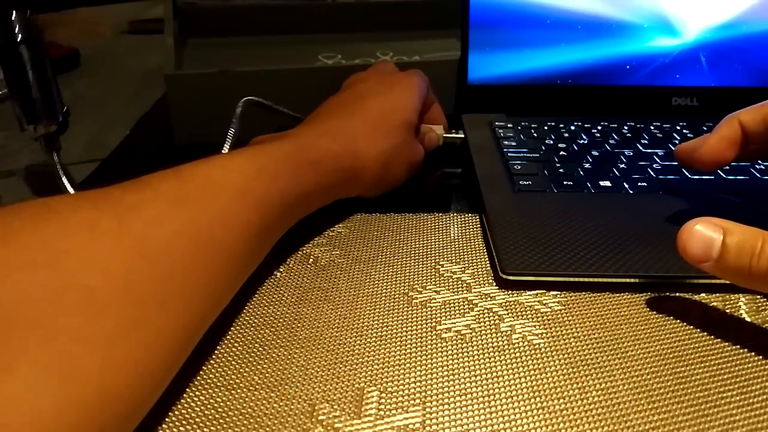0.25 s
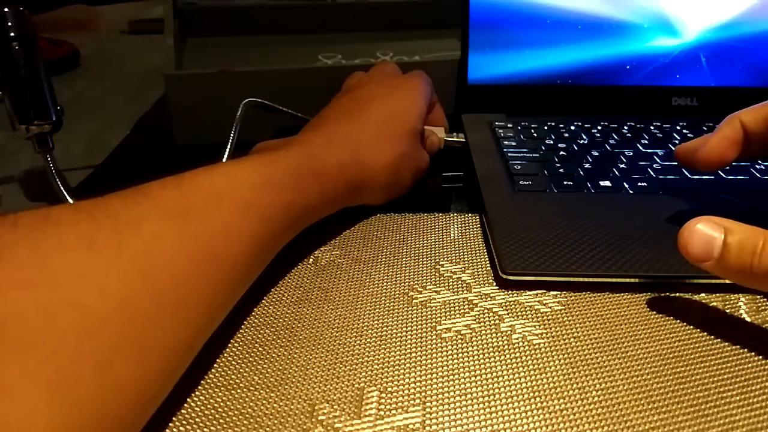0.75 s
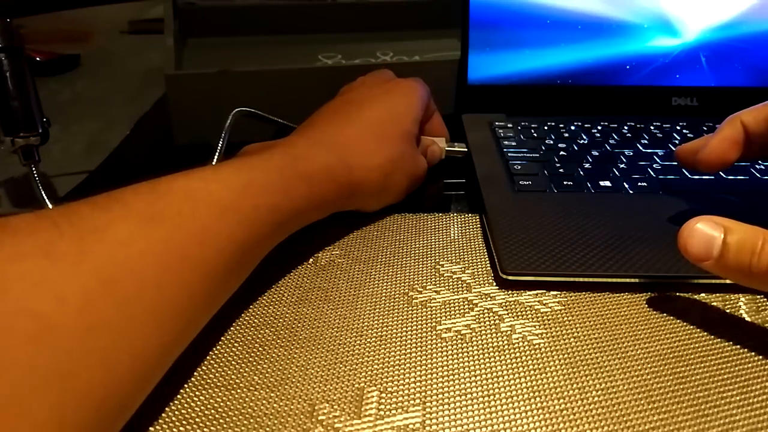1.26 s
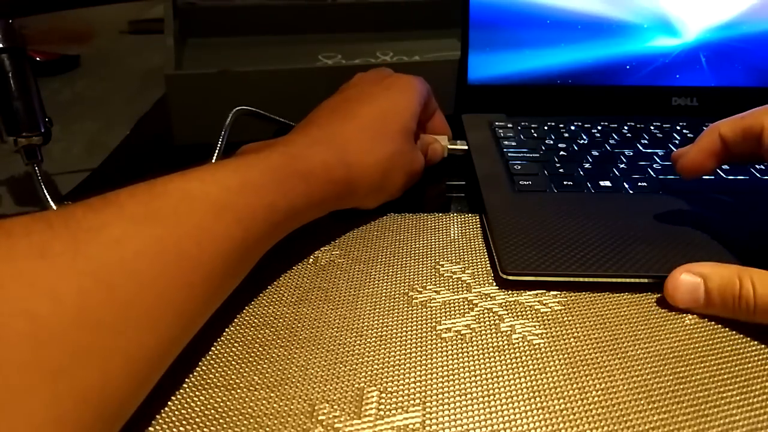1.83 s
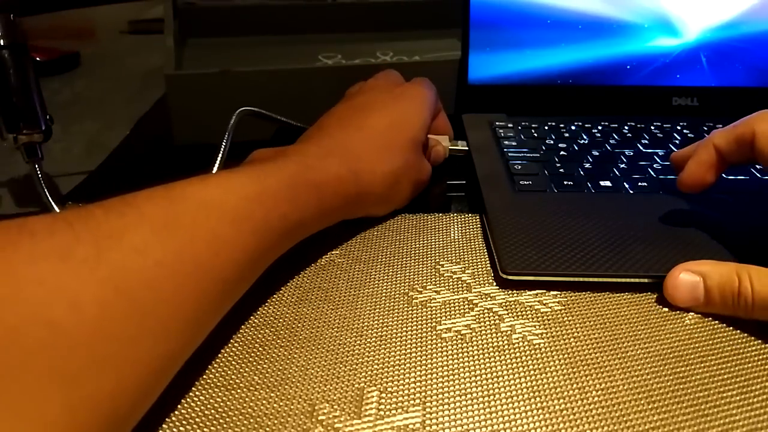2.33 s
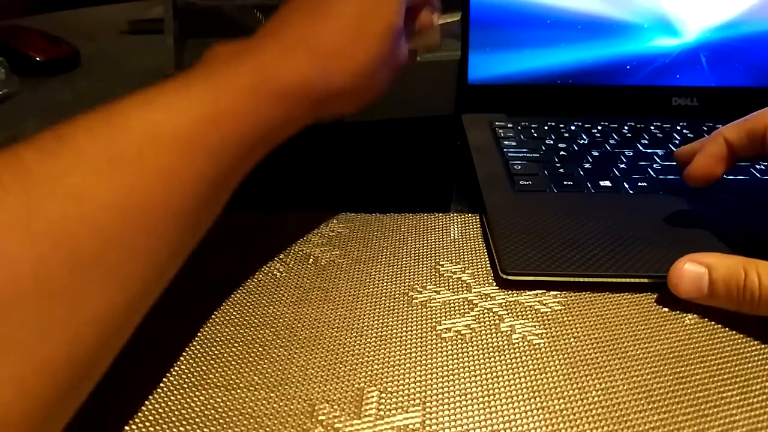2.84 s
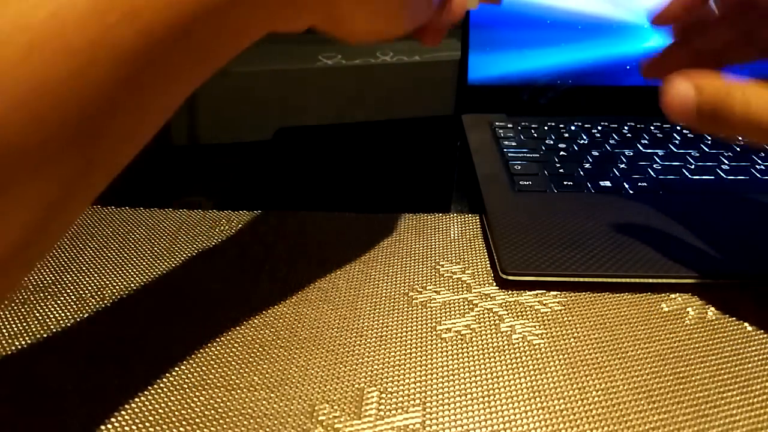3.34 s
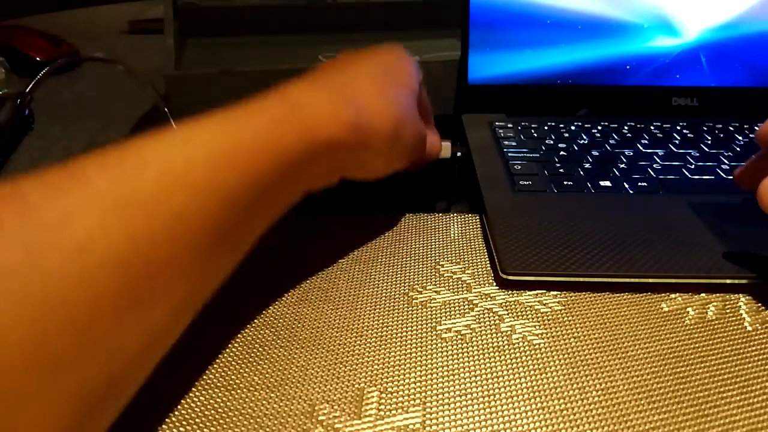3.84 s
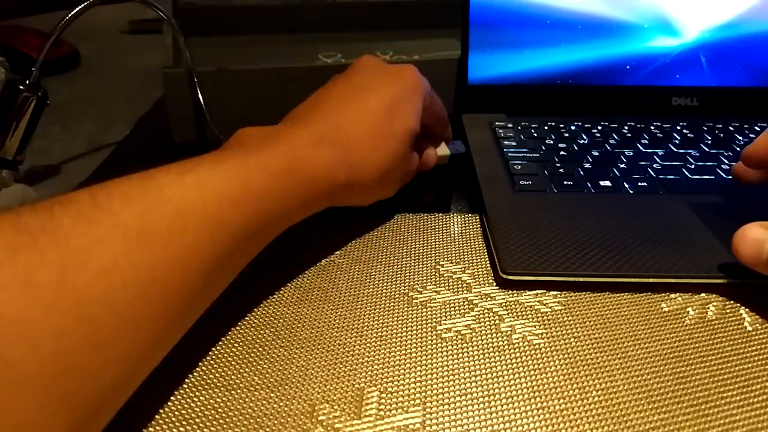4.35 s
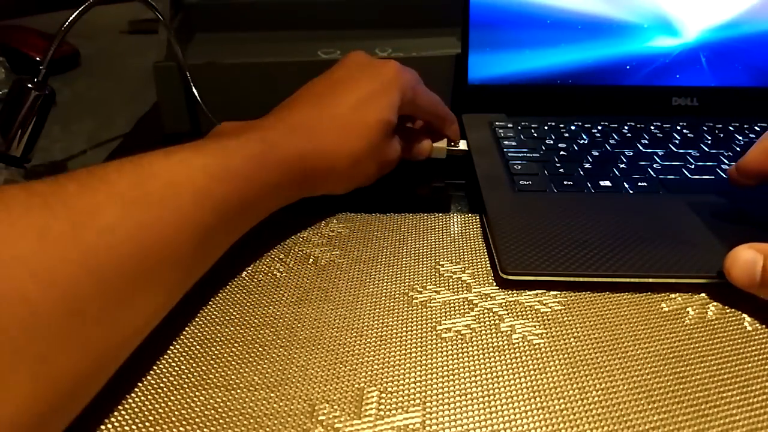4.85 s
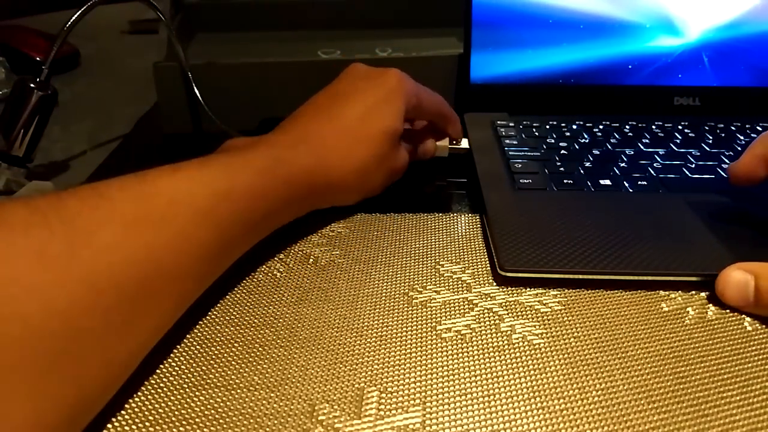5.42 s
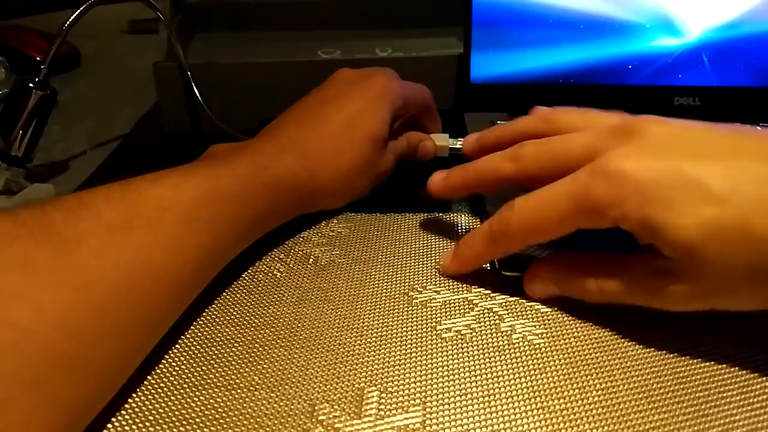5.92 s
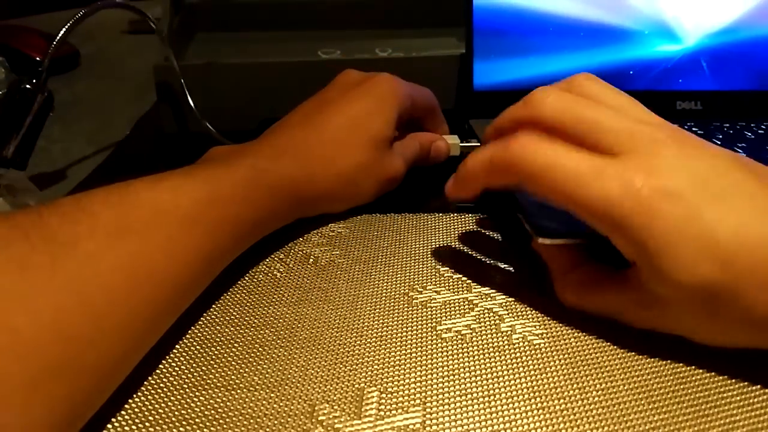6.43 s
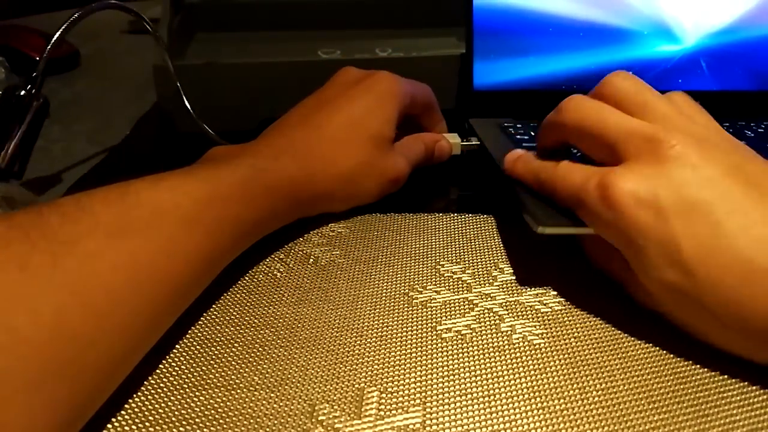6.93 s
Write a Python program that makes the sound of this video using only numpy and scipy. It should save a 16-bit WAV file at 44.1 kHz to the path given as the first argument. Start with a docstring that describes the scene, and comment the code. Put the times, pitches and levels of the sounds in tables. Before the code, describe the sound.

Over a steady quiet fan, a small metal connector snaps in a socket, clatters sharply mid-way, and hands slide, tap and bump.

```python
"""A metal USB plug is worked in a laptop port, pulled out and offered up again, in a quiet room.
Throughout, a fan hums: coloured noise and wavering tones. First the shell grazes the rim in light ticks,
then the plug clicks in its socket: short noise cracks through case resonances, with a hollow knock.
Next come slides (swelling noise), soft bumps (narrow-band noise) and taps of the fingers (noise cracks).
Last to join are hard knocks, the desk top ringing on after them, then scrapes: both runs of tiny notes."""
import sys
import numpy as np
from scipy import signal
from scipy.fft import rfft, irfft
from scipy.io import wavfile
from scipy.ndimage import uniform_filter1d

SR = 44100
rng = np.random.default_rng(int(sys.argv[2]) if len(sys.argv) > 2 else 0)


def materialize(psi):
    """Save the field psi as 16-bit PCM at rate SR to the path in sys.argv[1].

    A 1-D psi becomes a single channel; in a 2-D psi each row is a channel.
    """
    bounded = np.clip(np.atleast_2d(psi).T, -1, 1)
    quanta = np.round(bounded * 32767).astype(np.int16)
    wavfile.write(sys.argv[1], SR, quanta)


N = 316638


def amp(db):
    """Level law: a gain is ten to the power of its decibels over twenty."""
    return 10 ** (np.asarray(db) / 20)


def evened(x):
    """Normalization: scales a signal to an rms of one."""
    return x / np.sqrt(np.mean(abs(x) ** 2) + 1e-20)


def read(points, hz):
    """Interpolation along a logarithmic frequency axis."""
    f, value = np.transpose(points)
    return np.interp(np.log(hz + 1), np.log(f + 1), value)


def bins(x):
    """Fourier analysis: the frequencies [Hz] in the spectrum of x."""
    return np.fft.rfftfreq(x.shape[-1], 1 / SR)


def add(mix, s, sound):
    """Superposition: a stereo sound joins the mix at time s [s]."""
    part = mix[:, round(s * SR):][:, :sound.shape[1]]
    part += sound[:, :part.shape[1]]


def sides(left_db):
    """Interchannel level difference, shared equally between the two gains."""
    return amp(np.array([left_db, -left_db]) / 2)


# likeness of the two microphone signals: (frequency [Hz], correlation [-1 to 1])
LIKENESS = [(130, 0.99), (290, 0.91), (450, 0.46), (680, -0.26), (1400, -0.28), (3000, 0.062)]


def paired(x, reach=1):
    """Spatial coherence: close microphones share long waves; direct sound does so up to reach times higher."""
    left, other = rfft(x)
    same = np.clip(read(LIKENESS, bins(x) / reach), -1, 1)
    right = same * left + np.sqrt(1 - same ** 2) * other
    return irfft(np.array([left, right]), x.shape[1])


def noise(spectrum):
    """Spectral shaping: stereo noise of a given colour and unit rms."""
    x = paired(rng.standard_normal((2, N)))
    return evened(irfft(rfft(x) * amp(read(spectrum, bins(x))), N))


def drift(rate):
    """Low-pass random process: slow chance of unit rms, limited to about rate [Hz]."""
    x = rng.standard_normal(N)
    return evened(irfft(rfft(x) * np.exp(-(bins(x) / rate) ** 2), N))


def coloured(x, gain_db, size=4096):
    """Minimum-phase filtering: it is causal, so every peak of the gain rings after the blow."""
    log_gain = np.log(amp(gain_db(np.abs(np.fft.fftfreq(size, 1 / SR)))))
    minimum_phase = np.exp(np.conj(signal.hilbert(log_gain)))
    taps = np.fft.ifft(minimum_phase).real
    return signal.fftconvolve(x, taps[None], axes=1)


LEAD = .004  # margin before a contact [s]


def contact(rise, scatter, scatter_db, reach, size=2048):
    """Impact: many tiny contacts swell and die in milliseconds, then scatter off desk and screen."""
    t = np.arange(size) / SR - LEAD
    u = np.maximum(t / rise + .5, 0)
    crack = u * np.exp(-u)
    echoes = (t > 0) * np.exp(-abs(t) / scatter)
    envelope = evened(crack) + amp(scatter_db) * evened(echoes)
    z = rfft(paired(envelope * rng.standard_normal((2, size)), reach))
    smooth_power = uniform_filter1d(abs(z) ** 2, size=17, axis=1)
    white = irfft(z / np.sqrt(smooth_power))
    return white * signal.windows.tukey(size, .1)


# reverberation of the room: (frequency [Hz], time to fall by 60 dB [s])
REVERBERATION = [(250, 0.49), (660, 0.71), (1740, 0.84), (4600, 0.73), (9000, 0.56), (14000, 0.34)]
CLUMP_DB = 1.5  # reflections arrive in uneven clumps: rms of their level [dB]


def room_tail():
    """Reverberation: diffuse reflections of unit energy (left), each band dying at its own speed."""
    hz, t, z = signal.stft(paired(rng.standard_normal((2, SR * 3 // 4))), SR, nperseg=256)
    t60 = read(REVERBERATION, hz)[:, None]
    clumps = CLUMP_DB * evened(uniform_filter1d(rng.standard_normal(len(t)), size=2))
    onset = 1 - np.exp(-t / 0.00058)
    tail = signal.istft(z * amp(clumps - 60 * t / t60) * onset, SR, nperseg=256)[1]
    return tail / np.linalg.norm(tail[0])


def in_room(x, room_db):
    """Convolution with the room response, added to the dry sound."""
    return x + amp(room_db) * signal.fftconvolve(x, room_tail(), axes=1)[:, :N]


def body_db(resonances, hz, between_db):
    """Modal response: the powers of a struck body's resonances add to a plain background."""
    peaks = sum(amp(db) ** 2 / (1 + (2 * (hz - f) / width) ** 2) for f, width, db in resonances)
    return 10 * np.log10(amp(between_db) ** 2 + peaks)


# single reflections from wall and ceiling: (delay [s], level [dB])
REFLECTIONS = [(.0108, -19), (.0182, -16)]


def heard(crack, resonances, wet_db, between_db, focus_db, ragged_db):
    """Direct, early and late sound: the ring mostly fills the room; each spot favours its own partials."""
    room = amp(wet_db) * np.pad(room_tail(), ((0, 0), (round(LEAD * SR), 0)))
    near = np.zeros_like(room)
    add(near, 0, crack)
    for delay, db in REFLECTIONS:
        add(near, delay, amp(db) * crack[::-1])  # arrives from the other side
    near = coloured(near, lambda hz: body_db(resonances, hz, between_db), size=16384)
    room = coloured(room, lambda hz: body_db(resonances, hz, between_db + focus_db), size=16384)
    spots_hz = np.arange(0, SR / 2, 130)
    chance = np.clip(rng.standard_normal(len(spots_hz)), -2, 1)
    ripple = chance * np.interp(spots_hz, [800, 3000], [0, 1])  # the lowest partials stay even
    return coloured(near + room, lambda hz: ragged_db * np.interp(hz, spots_hz, ripple))


# bands of a blow, namely thud, case ring, edge and top: (frequency [Hz])
BLOW_BANDS = [400, 1150, 2900, 9500]
# effect of hardness in each band of a blow: (gain per step of hardness [dB])
HARDNESS_GAIN = [0.8, -0.22, 0.5, 3]
# level difference of a blow between the channels: (frequency [Hz], left minus right [dB])
BLOW_SIDE = [(400, 0), (1200, 0), (2400, 2.5), (4400, 0.5), (8100, 7.5), (13500, 9)]


def blow(sound, tone, strength_db, hardness=0, weight_db=0, bass_db=-14):
    """Radiation of a blow: hardness tilts its spectrum, weight lifts its lows, small things give little bass."""
    levels = np.add(tone, strength_db) + np.multiply(hardness, HARDNESS_GAIN)
    points = list(zip(BLOW_BANDS, levels))
    low = [(130, bass_db + weight_db), (240, weight_db), (480, weight_db), (1000, 0)]
    sound = coloured(sound, lambda hz: read(points, hz) + read(low, hz))
    return irfft(rfft(sound) * sides(read(BLOW_SIDE, bins(sound))), sound.shape[1])


# resonances of the laptop case around the socket: (frequency [Hz], width [Hz], level [dB])
CASE_MODES = [(280, 80, 2), (590, 90, 0), (1010, 50, 5), (1270, 130, 3), (1490, 110, 8.5), (2280, 170, 6),
              (2980, 260, 0), (4900, 900, 3), (5800, 900, 5), (10100, 2500, 3)]


def click(s, strength_db, hardness=0, weight_db=0, pitch=1, *, tone, room_db, between_db):
    """Modal excitation: plug or finger meets the case, whose pitch depends on how it is pressed."""
    crack = contact(rise=.001, scatter=.008, scatter_db=-14, reach=3)
    case = [(hz * pitch, width, db) for hz, width, db in CASE_MODES]
    sound = heard(crack, case, room_db, between_db, focus_db=-6.5, ragged_db=1.5)
    return s - LEAD, blow(sound, tone, strength_db, hardness, weight_db)


def clicks(rows, tone, room_db, between_db):
    """Superposition of all the clicks of one kind."""
    out = np.zeros((2, N))
    for row in rows:
        add(out, *click(*row, tone=tone, room_db=room_db, between_db=between_db))
    return out


def ring(hz, db, swell, lag):
    """Flexural vibration: a panel note peaks after swell [s], then dies; it is lag [s] later at the right."""
    t = np.maximum(np.arange(SR // 6) / SR - np.array([[0], [lag]]), 0)
    envelope = t / swell * np.exp(1 - t / swell)
    return amp(db) * envelope * np.sin(2 * np.pi * hz * t)


# colour of fan and room air: (frequency [Hz], relative level [dB])
AIR_COLOUR = [(25, -11.5), (65, -20.5), (105, -6.5), (140, -19), (175, -3), (240, -0.5), (350, -5),
              (520, -8), (900, -12.5), (1250, -13.5), (2800, -25.5), (6500, -30), (10500, -28),
              (14000, -31)]
AIR_DB = -52.5  # level of the air before its rush swells
# tones of the fan: (frequency [Hz], rms level [dB])
FAN_TONES = [(177.6, -68), (241, -61), (281, -80), (479, -72.5), (527.6, -67)]


def fan(waver=0.5, wander=0.3, swell_db=1.57, swell_below_hz=1500):
    """Flow noise and tones: a low rush swells a little under an even hiss; tones waver in level and phase."""
    t = np.arange(N) / SR
    tones = np.zeros(N)
    for hz, db in FAN_TONES:
        phase = 2 * np.pi * hz * t + wander * drift(1.7)
        tones += amp(db) * evened((1 + waver * drift(1.8)) * np.sin(phase))
    air = amp(AIR_DB) * noise(AIR_COLOUR)
    rush = irfft(rfft(air) * np.exp(-(bins(air) / swell_below_hz) ** 2), N)
    return air + (amp(swell_db * drift(9.3)) - 1) * rush + tones


# the plug's shell grazes the rim of the port or the case:
# (time [s], strength [dB], hardness [steps], weight [dB], pitch of the case ring [ratio])
GRAZES = [(.1245, -23, -1.5, -6, 0.98), (.5721, -19, 4, 5, 0.86), (.775, -19, 0.5, -2, 0.85),
          (2.125, -40, 10, 15, 1.5), (2.6047, -26.5, 5.5, -14, 0.95), (2.866, -26.5, -1, 2, 0.4),
          (3.1442, -30.5, 6.5, -5, 1.4), (3.5418, -27, 9.5, 0, 0.88), (3.5526, -12.5, 7.5, -2, 1),
          (3.5582, -19.5, 12, 8.5, 0.54), (3.616, -9, 0, -7, 1.4), (4.031, -28.5, 10.5, 0, 0.78),
          (4.0965, -26.5, 9.5, -5, 1.3), (5.021, -20, 2.5, 6, 0.83), (5.9964, -16.5, 4.5, 3, 0.96),
          (6.1895, -20, 4, 4, 1), (7.041, -26, 6, 10, 0.87)]
# tone shared by all grazes, in each band of a blow: (level [dB])
GRAZE_TONE = [2.5, 0, -1.5, -28.5]


def grazes():
    """Light impact: the shell touches the rim and the case answers over a strong plain background."""
    return clicks(GRAZES, GRAZE_TONE, room_db=-5, between_db=4.0)


# the plug meets the socket or catches on its springs:
# (time [s], strength [dB], hardness [steps], weight [dB], pitch of the case ring [ratio],
#  room [dB], hollow knock [dB], note of the hollow knock [Hz])
SOCKET_CLICKS = [(1.6011, -2.5, -2, -2.5, 0.93, -8, -25.5, 1230),
                 (1.7118, -14, 1, -14, 0.886, -19, -32.5, 1115),
                 (1.9672, -0.5, 1, -2.5, 1.08, -8, -25.5, 1330),
                 (4.2714, 3, -3.5, -8, 0.79, 0.5, -21.5, 1250),
                 (4.8105, -13.5, 0.5, -5.5, 1, -2.5, -29, 1200), (5.2145, -23, -14, 18, 0.74, 5, -43, 950),
                 (5.368, -14.5, -3, 8, 1.05, -3.5, -41, 1270)]
# tone shared by all socket clicks, in each band of a blow: (level [dB])
SOCKET_TONE = [0.5, 0.5, -4, -16]
# lower notes of the case under a hollow knock: (frequency [Hz], level [dB], swell [s])
PANEL_NOTES = [(298, -22, 0.0064), (628, -18, 0.0054), (1010, -19.5, 0.0082)]
SWELL_S = 0.0012  # rise of the hollow knock
FLEX_DELAY_S = 0.00068  # from the snap to the answer of the case


def socket(between_db=-1.5, lag=0.00021):
    """Snap and panel flexure: the plug meets its springs, then a hollow knock, deeper under a heavy push."""
    out = np.zeros((2, N))
    for s, strength_db, hardness, weight_db, pitch, room_db, ring_db, ring_hz in SOCKET_CLICKS:
        add(out, *click(s, strength_db, hardness, weight_db, pitch,
                        tone=SOCKET_TONE, room_db=room_db, between_db=between_db))
        panel = sum(ring(hz, ring_db + db + weight_db / 2, swell, lag) for hz, db, swell in PANEL_NOTES)
        hollow = ring(ring_hz, ring_db, SWELL_S, lag)
        add(out, s + FLEX_DELAY_S, hollow + panel)
    return out


# skin and cable slide over case and cloth:
# (time of the strongest point [s], length [s], hiss [dB], extra treble at the left at BEAM_HZ [dB])
STROKES = [(2.791, 0.044, -55, 1), (2.842, 0.04, -52, -1), (3.104, 0.056, -61, 5), (3.215, 0.03, -68, 19.5),
           (4.019, 0.15, -50, 0), (4.262, 0.13, -42.5, 1), (5.773, 0.056, -62, 14),
           (6.37, 0.17, -56.5, 1.5), (6.649, 0.036, -64.5, 15), (6.741, 0.18, -65, 6), (7.098, 0.5, -61, 2)]
# colour of the hiss: (frequency [Hz], relative level [dB])
HISS_COLOUR = [(1000, -22), (2200, 6), (4000, 5), (6000, 4), (9200, 7), (11500, 3.5), (14500, -1.5)]
# colour of the dull scuff under every slide: (frequency [Hz], relative level [dB])
SCUFF_COLOUR = [(120, -35), (280, 2.5), (500, 1), (720, 0.5), (950, -3), (1300, -6.5), (2500, -14),
                (6000, -47), (14000, -31)]
SCUFF_DB = -53.5  # rms of the scuff before the stroke shapes it
RISE_SHARE = 0.4  # part of a slide spent gathering speed
CATCH_DB = 2.2  # rms unevenness of a slide as the surfaces catch
BEAM_HZ = 9700  # the extra treble grows in proportion to frequency


def slides(grit_db=2.0, room_db=-8):
    """Dry friction: noise swells and fades with each stroke, uneven as the surfaces catch."""
    t, out = np.arange(N) / SR, np.zeros((2, N))
    unevenness = amp(CATCH_DB * drift(200) + grit_db * drift(3000))
    hiss = noise(HISS_COLOUR) * unevenness
    scuff = amp(SCUFF_DB) * noise(SCUFF_COLOUR)
    for s, length, hiss_db, left_db in STROKES:
        near = abs(t - s) < 2 * length
        u = (t[near] - s) / length
        speed = np.exp(-(u / np.where(u < 0, RISE_SHARE, 1 - RISE_SHARE)) ** 2)
        left, right = amp(hiss_db) * hiss[:, near]
        left = irfft(rfft(left) * amp(left_db * bins(left) / BEAM_HZ), len(u))
        out[:, near] += speed * (np.array([left, right]) + scuff[:, near])
    return in_room(out, room_db)


# soft bumps of hand, cable and laptop on the desk:
# (time [s], length [s], frequency [Hz], rms level before the fade [dB])
SOFT_BUMPS = [(2.853, .07, 690, -50), (6.673, 0.05, 252, -46), (6.784, 0.049, 275, -41.5)]


def bumps(order=2):
    """Resonance under a random force: a soft, uneven push stirs one broad mode of desk top or case."""
    out = np.zeros((2, N))
    for s, length, hz, db in SOFT_BUMPS:
        push = paired(rng.standard_normal((2, SR // 2)), reach=2.1)
        band = signal.butter(order, [hz * .9, hz * 1.1], "band", fs=SR, output="sos")
        sway = signal.sosfilt(band, push)[:, -round(length * SR):]
        add(out, s, amp(db) * evened(sway) * signal.windows.hann(sway.shape[1]))
    return out


# fingertips and nails touch down: (time [s], strength [dB])
FINGER_TAPS = [(3.316, -30.5), (5.6843, -25.5), (5.7306, -19.5), (6.307, -31), (6.328, -23),
               (6.5073, -21.5), (6.8, -25.5), (7.1543, -20.5)]
# tone shared by all finger taps, in each band of a blow: (level [dB])
FINGER_TONE = [1.5, -8.5, -15.5, -9.5]


def fingers():
    """Light impact: a fingertip or nail meets the case, its resonances over a strong plain background."""
    return clicks(FINGER_TAPS, FINGER_TONE, room_db=2.0, between_db=10.0)


# harder knocks and their rebounds:
# (time [s], strength [dB], hardness [steps], weight [dB], direct sound to the left [dB],
#  share of metal ring [0-1], room [dB], leading note [dB], its pitch [Hz], its swell [s])
HARD_KNOCKS = [(3.5595, 0, -19.5, 21, -10, 0, 5, -30, 900, 0.0026),
               (3.5692, 8.5, 2.5, 3, -7, 0.9, 0, -36.5, 286, 0.0078),
               (3.7041, 3.5, 0, -7, -2, 0.7, -1, -28, 1980, 0.0014),
               (3.7072, -3, -11, 1, -7, 0, 2, -30, 944, 0.0025),
               (3.7200, 0.5, 2.5, 4, 4, 0.25, -1, -36, 470, .0035),
               (3.7238, -8.5, -2.5, 8.5, 5, 0.1, 3.5, -33.5, 974, 0.0037),
               (4.2728, 8.5, -1.5, -3.5, 0, 0.3, -4, -34, 720, 0.0095),
               (4.2802, 11.5, -10, 7, -1, 0, -8, -33.5, 450, 0.0022),
               (4.291, -1, -4, 8, 13, 0.2, 0, -35, 1170, 0.0021),
               (4.518, -15, -9.5, 12, 1, 0.2, 6, -49, 1320, .003),
               (6.2177, -5, -4, 9, -1, 0.24, 5, -34.5, 1194, 0.0014),
               (6.239, -6.5, -8, 12.5, 7, 0.3, -5, -37, 978, 0.0034),
               (6.25, -21, -18, 0, 0, 0, 0, -44, 697, 0.013)]
# tone shared by all knocks, in each band of a blow: (level [dB])
HARD_TONE = [-9, -8, -8.5, -14]
# resonances of the desk top: (frequency [Hz], width [Hz], level [dB])
DESK_MODES = [(279, 12, 14), (330, 60, 3), (490, 60, 7), (630, 16, 9), (703, 7, 18), (772, 14, 8),
              (985, 70, 6), (1120, 110, 7), (1275, 70, 7), (1400, 60, 6), (1610, 110, 3), (1800, 150, 2),
              (2010, 130, 6), (2320, 130, 7), (2700, 220, 4), (10000, 3200, 3)]
# partials of the struck metal: (frequency [Hz], width [Hz], level at a full share of metal [dB])
METAL_PARTIALS = [(1490, 8, 10), (3030, 50, 7), (3350, 70, 7), (3920, 35, 9), (4330, 16, 12),
                  (4650, 30, 10), (4910, 50, 5), (5230, 80, 5), (5750, 35, 10), (6290, 80, 6),
                  (6750, 13, 15), (7710, 20, 13), (8320, 40, 8), (8586, 40, 9), (9118, 40, 13),
                  (9310, 25, 13), (10680, 50, 12), (11380, 40, 12), (12100, 14, 12), (13400, 900, 7)]


def knocks(between_db=-3.5, bass_db=-6, ring_room_db=-12, lag=0.00011):
    """Modal impact: desk top and metal ring on with the room, and each spot struck has a leading note."""
    out, rings = np.zeros((2, 2, N))
    for s, strength_db, hardness, weight_db, left_db, metal, room_db, ring_db, ring_hz, swell in HARD_KNOCKS:
        metal = np.clip(metal, .01, 1)
        share_db = 10 * np.log10(metal)
        body = DESK_MODES + [(hz, width, db + share_db) for hz, width, db in METAL_PARTIALS]
        crack = contact(rise=.001, scatter=.009, scatter_db=-6, reach=2)
        crack = crack * sides(left_db)[:, None]
        sound = heard(crack, body, room_db, between_db, focus_db=-8 * metal, ragged_db=2)
        add(out, s - LEAD, blow(sound, HARD_TONE, strength_db, hardness, weight_db, bass_db))
        add(rings, s, ring(ring_hz, ring_db, swell, lag))
    return out + in_room(rings, ring_room_db)


# plug and cable rattle or drag; the first row is the desk top ringing on unevenly after the knocks:
# (time [s], length [s], middle note [Hz], rms level [dB])
NOTE_RUNS = [(3.799, .16, 750, -52.5), (4.041, .04, 935, -55), (4.299, 0.034, 905, -47),
             (4.506, .03, 1080, -53.5), (4.854, 0.028, 700, -48.5)]
NOTES_PER_S = 260  # tiny notes in a run


def ringing_and_scrapes(octaves=0.31, swell=0.0016, uneven_db=4, room_db=-5):
    """Random pulse train: loose runs of tiny notes give the desk's uneven ringing, then stick-slip scrapes."""
    out = np.zeros((2, N))
    for s, length, hz, db in NOTE_RUNS:
        run, count = np.zeros((2, SR // 2)), max(round(length * NOTES_PER_S), 1)
        for k, (when, note, size, side) in enumerate(rng.uniform(-1.014, 1, (count, 4))):
            note_s = length * (k + .5 + when / 2) / count
            note_hz = hz * 2 ** (2 * octaves * note * abs(note))
            lag = side / hz / 2  # up to about half a cycle of the middle note
            add(run, note_s, ring(note_hz, uneven_db * size, swell, lag))
        add(out, s, amp(db) * run * np.sqrt(2 * length * SR) / np.linalg.norm(run))
    return in_room(out, room_db)


def scene():
    """Superposition of everything at the desk, in order of first appearance."""
    contacts = grazes() + socket() + slides() + bumps() + fingers() + knocks()
    return fan() + contacts + ringing_and_scrapes()


EDGE_HZ = 14240  # upper band limit


def record(dry, low_cut_hz=150, leak_db=-24):
    """Transducer response: the microphones shed most of the bass; then a low-pass sets the band limit."""
    hz = bins(dry)
    low_cut = 1 / np.sqrt(1 + (low_cut_hz / (hz + 1)) ** 12)
    thin = irfft(rfft(dry) * (low_cut + amp(leak_db)), N)
    low_pass = signal.firwin(255, EDGE_HZ, window=("kaiser", 8), fs=SR)
    return signal.oaconvolve(thin, low_pass[None], "same")


dry = scene()
out = record(dry)
materialize(out)
```